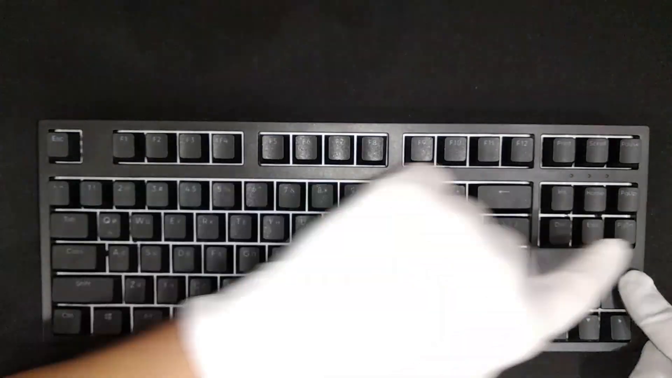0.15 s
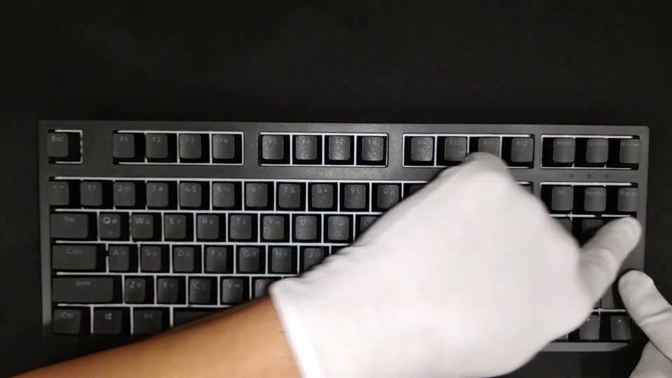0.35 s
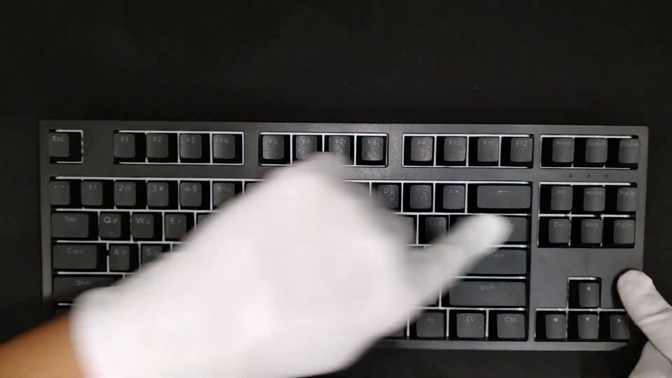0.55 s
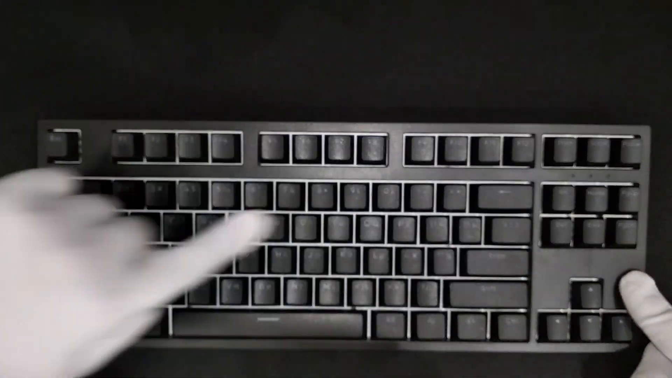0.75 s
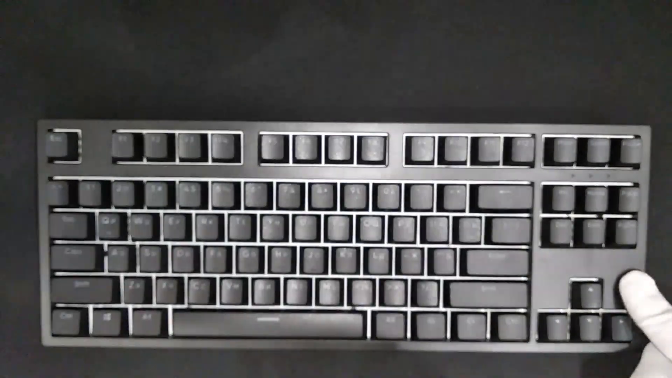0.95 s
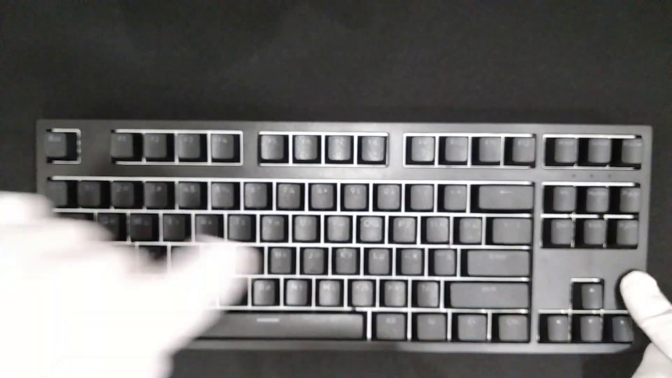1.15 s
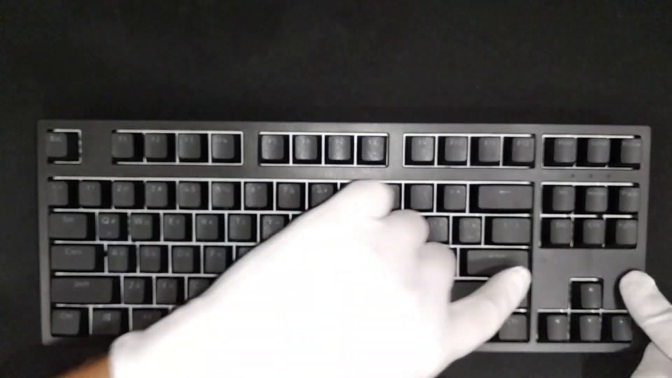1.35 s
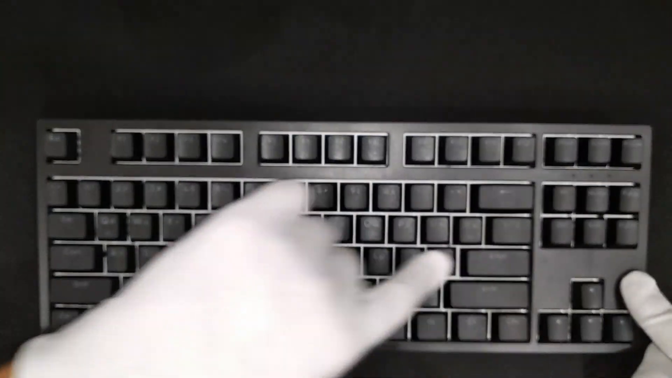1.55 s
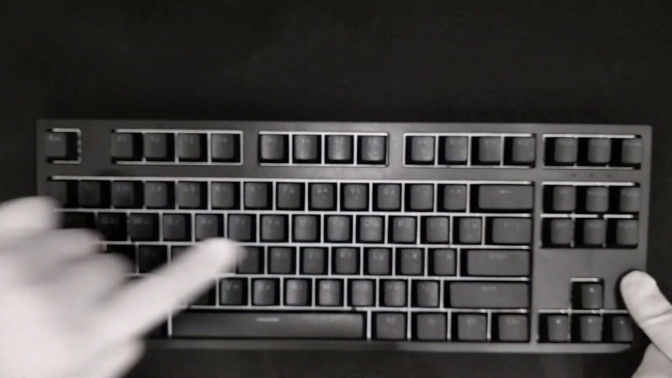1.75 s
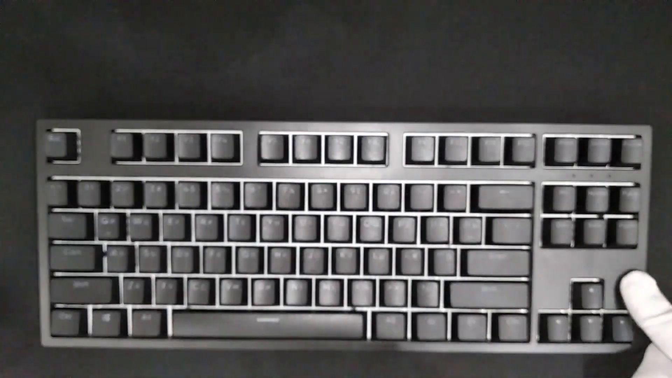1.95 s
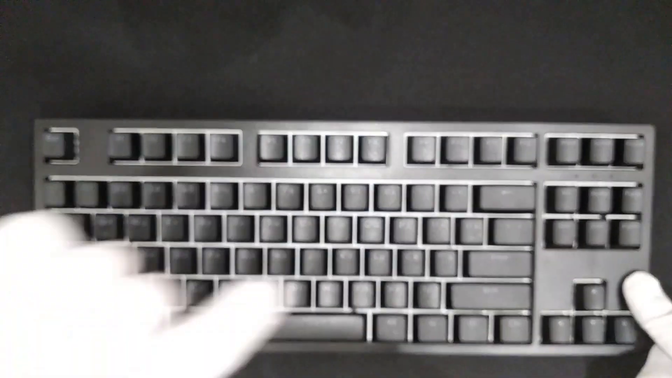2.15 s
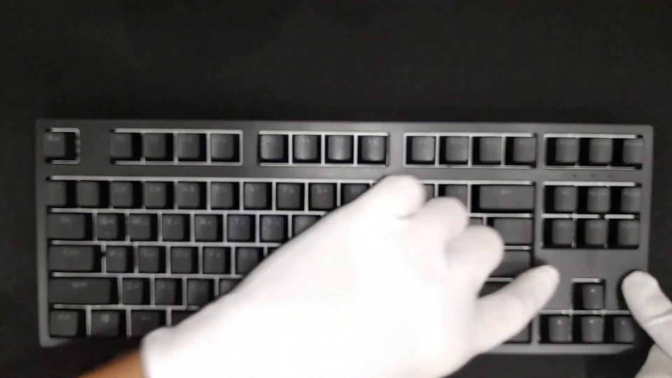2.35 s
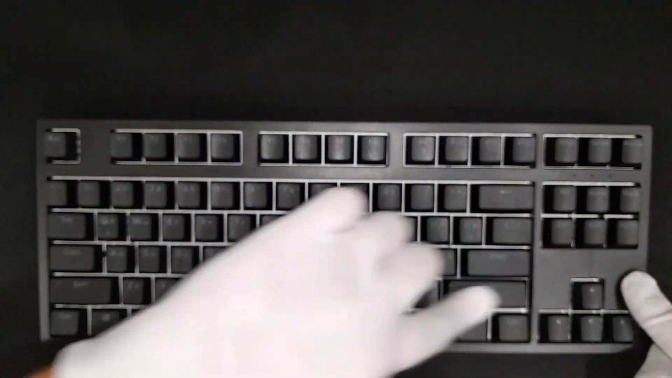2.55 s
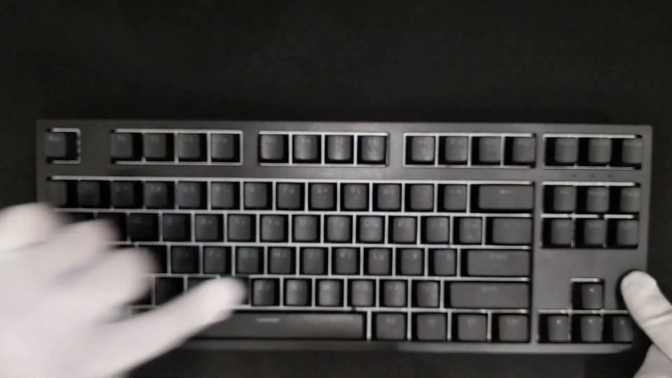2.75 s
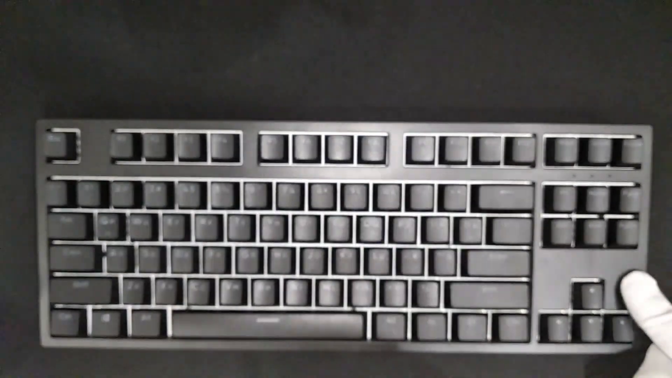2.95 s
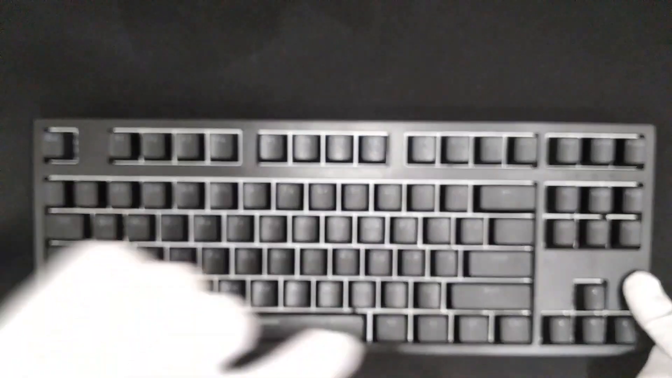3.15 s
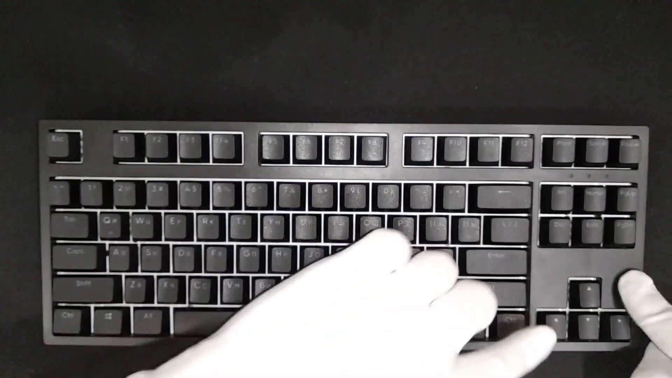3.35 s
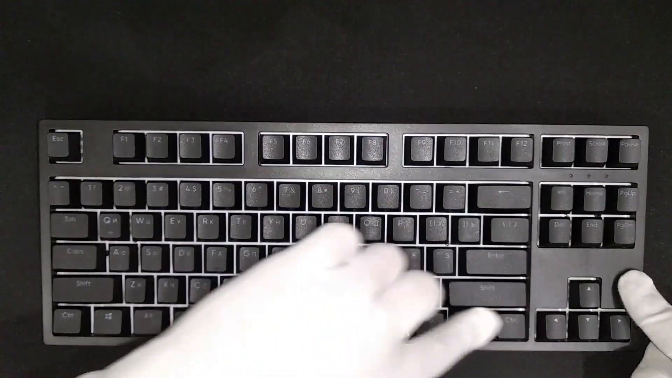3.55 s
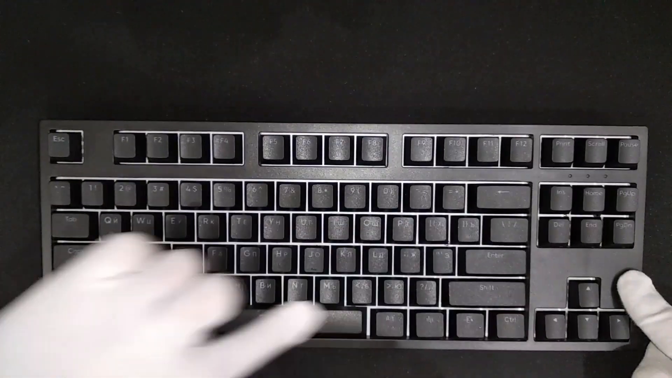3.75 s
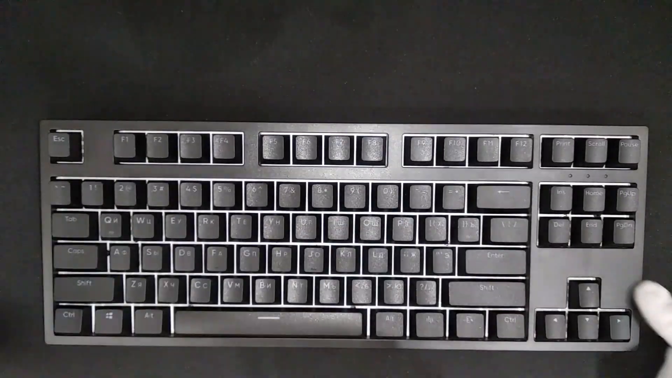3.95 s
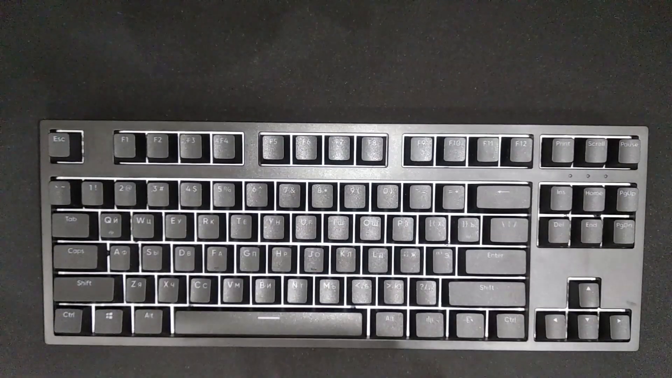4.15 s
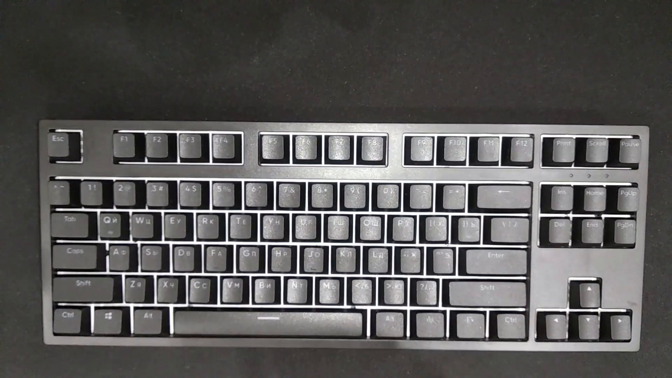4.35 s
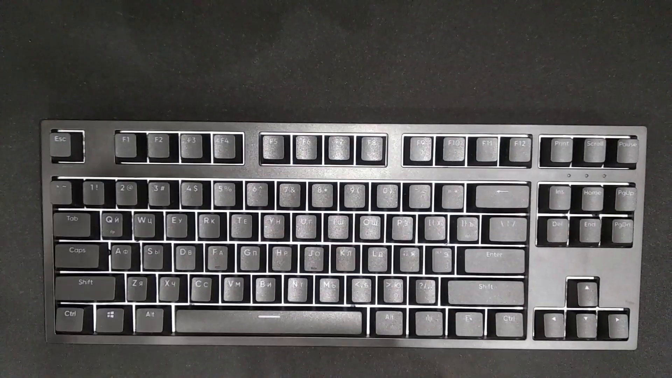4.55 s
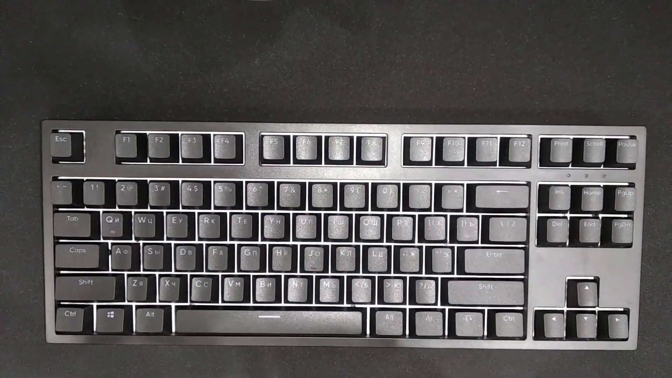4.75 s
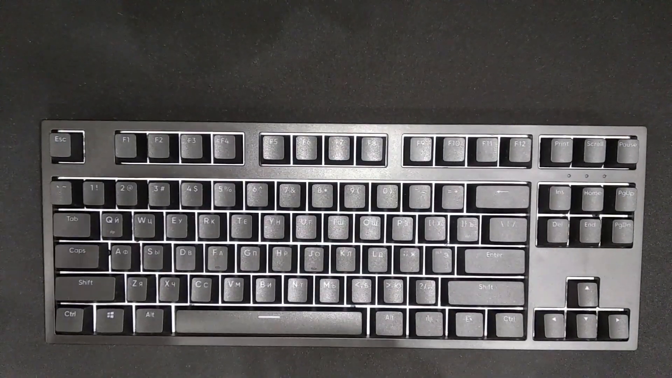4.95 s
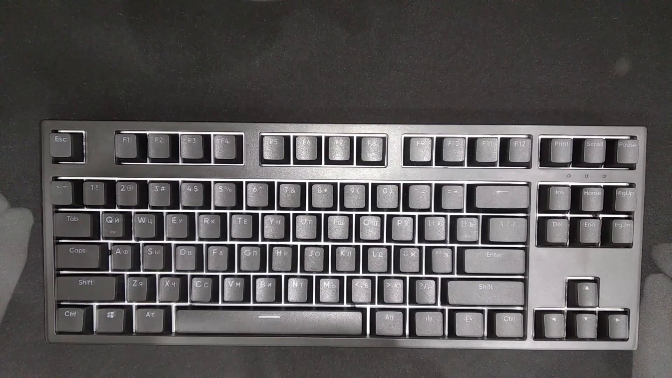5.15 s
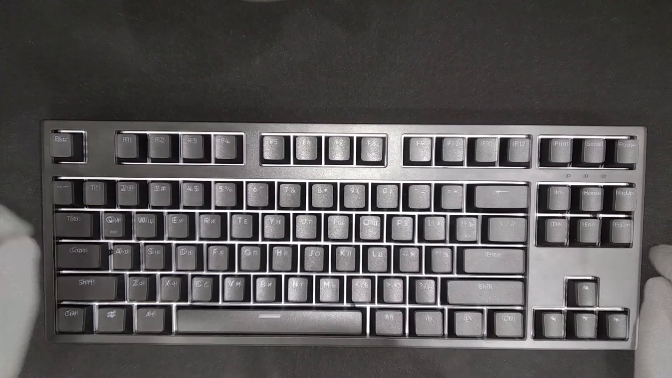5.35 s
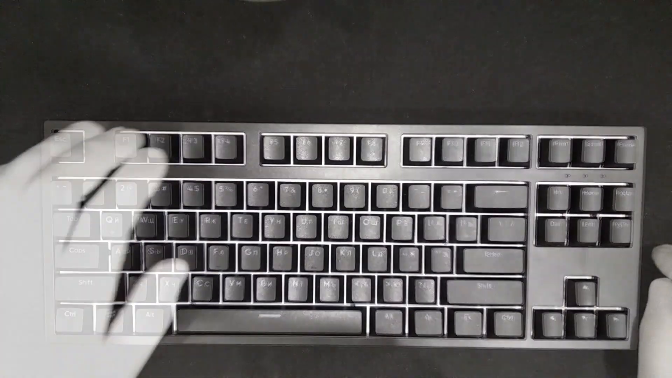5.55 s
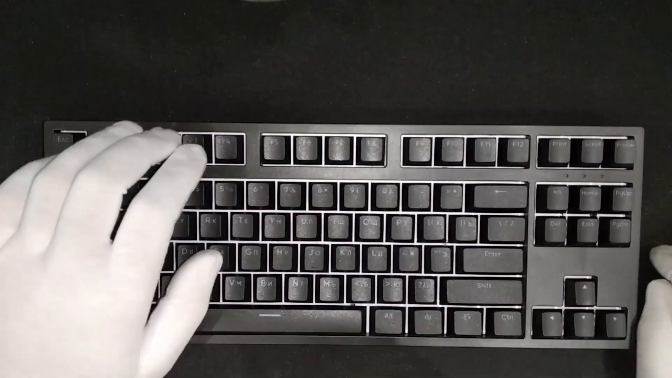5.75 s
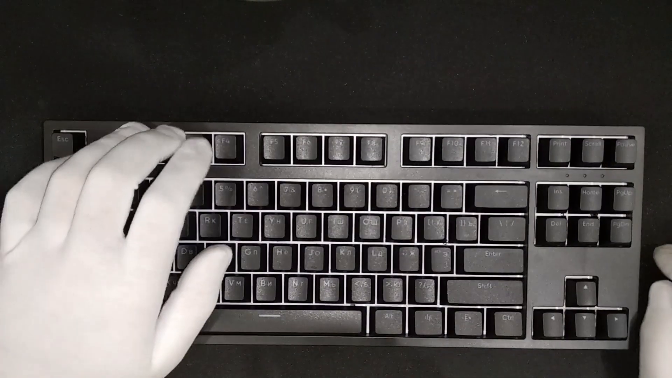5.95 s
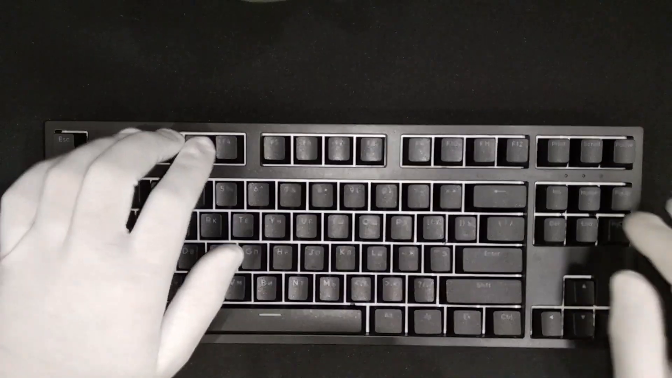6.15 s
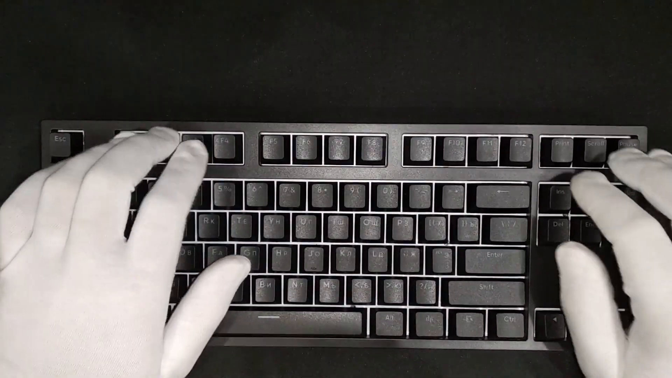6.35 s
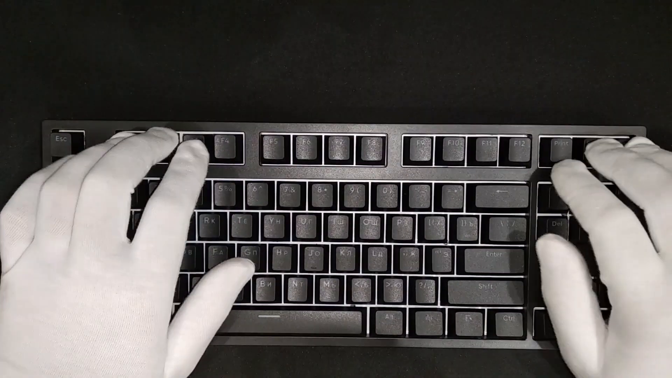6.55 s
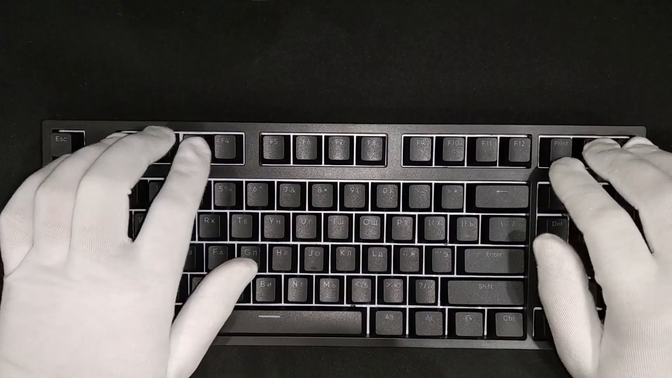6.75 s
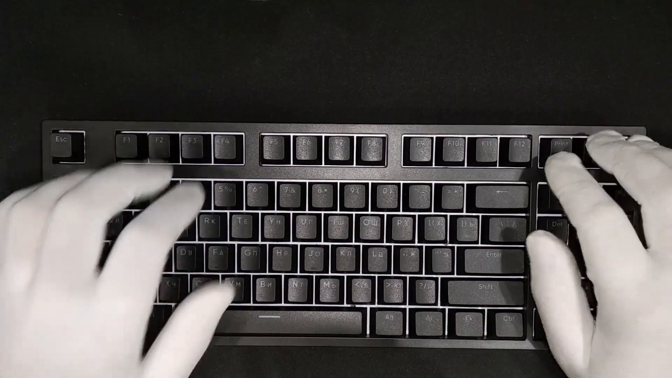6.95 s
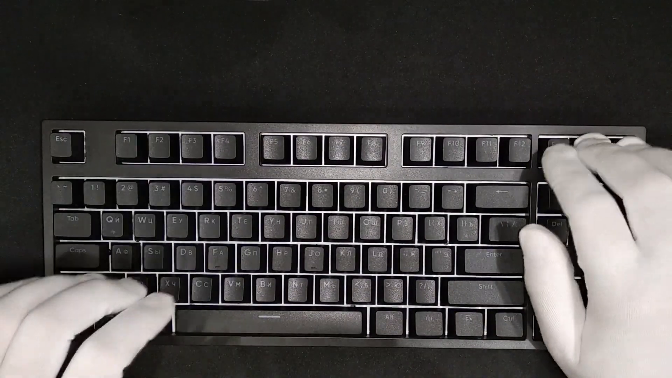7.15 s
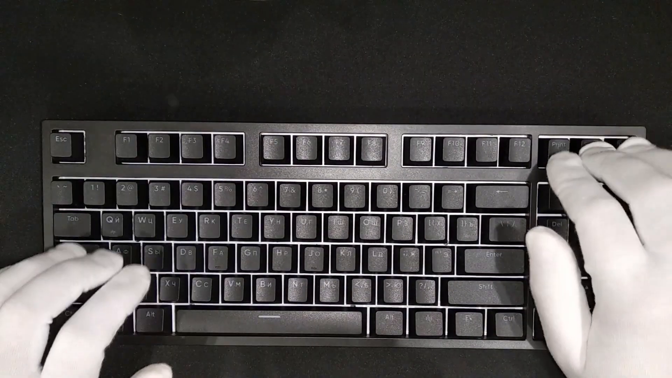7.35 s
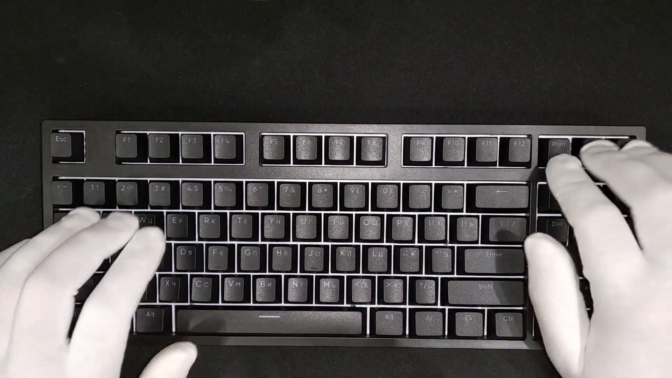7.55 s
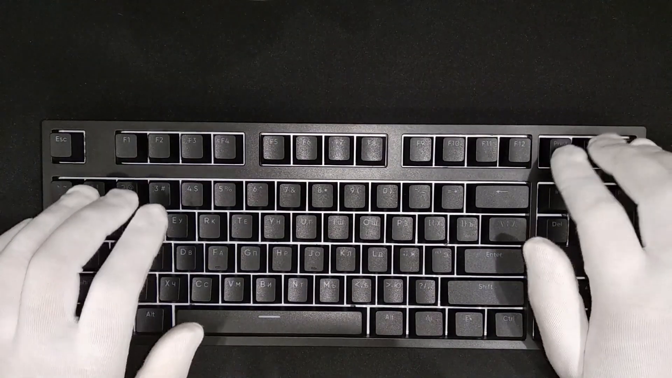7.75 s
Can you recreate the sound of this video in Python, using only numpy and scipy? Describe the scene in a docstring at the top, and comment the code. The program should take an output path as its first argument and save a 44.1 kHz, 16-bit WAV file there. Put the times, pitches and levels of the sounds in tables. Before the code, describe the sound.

Four fast plastic key-sweeps with cloth hiss and growing force, near silence, several bright click-and-release presses, then soft rapid tapping in a small room.

```python
"""Clattering sweeps first: a gloved finger runs four times along the rows of a mechanical keyboard,
close to the microphone. After a pause single keys are pressed and let go, then fingers patter lightly.
Every blow is a noise burst shaped by the resonances of cap and case; cloth is filtered hiss, and the
desk booms as dying sines. A small room answers, over the rumble, hiss and hum of the building."""
import sys
import numpy as np
from scipy import signal
from scipy.fft import rfft, irfft
from scipy.io import wavfile
from scipy.ndimage import uniform_filter1d

SR = 44100
rng = np.random.default_rng(int(sys.argv[2]) if len(sys.argv) > 2 else 0)


def wav_record(signal):
    """Record a signal, one row per channel, as 16-bit PCM in the file named by sys.argv[1]."""
    frames = np.transpose(np.atleast_2d(signal))
    bounded = np.clip(frames, -1, 1)
    # unit amplitude maps onto the largest positive 16-bit level
    quanta = np.round(bounded * 32767).astype(np.int16)
    wavfile.write(sys.argv[1], SR, quanta)


N = 347949  # length in samples
HZ = np.fft.rfftfreq(4096, 1 / SR)  # frequency axis of one blow


def gain_of(db):
    """Decibels to amplitude."""
    return 10 ** (np.asarray(db) / 20)


def evened(x):
    """Scales to rms 1."""
    return x / np.sqrt(np.mean(x ** 2) + 1e-20)


def read(points, hz):
    """Reads a table on a log-frequency axis."""
    f, value = np.transpose(points)
    return np.interp(np.log(hz + 1), np.log(f + 1), value)


def add(mix, s, sound):
    """Mixes a sound in at time s."""
    part = mix[max(round(s * SR), 0):][:len(sound)]
    part += sound[:len(part)]


def stray():
    """A chance amount between -1 and 1: no two keys are alike."""
    return 2 * rng.random() - 1


def bell(f, hz, width):
    """Shape of one resonance, 1 at its centre."""
    return 1 / (1 + (2 * (f - hz) / width) ** 2)


def shaped_noise(count, shape):
    """White noise filtered to a spectral shape, at rms 1."""
    return evened(irfft(rfft(rng.standard_normal(count)) * shape, count))


def causal(db):
    """Spectrum with this gain whose energy comes as early as it can (minimum phase)."""
    log_gain = np.log(gain_of(np.maximum(db, db.max() - 90)))
    mirrored = np.r_[log_gain, log_gain[-2:0:-1]]
    return np.exp(np.conj(signal.hilbert(mirrored)))[:len(db)]


def ring(modes):
    """Dying sines of a struck object."""
    t = np.arange(SR // 2) / SR
    return sum(gain_of(db - 60 * t / t60) * np.sin(2 * np.pi * hz * t) for hz, db, t60 in modes)


# Spectrum of the building's rumble and hiss. Each row: frequency in Hz, relative level in dB.
FLOOR_COLOUR = [(15, -32.5), (25, -11.5), (59, -0.5), (85, -3), (149, -13), (170, -17.5), (317, -24.5),
                (2910, -38.5), (8140, -41), (16000, -43)]
FLOOR_DB = -53.5  # rms


def floor():
    """Low rumble of the building under faint hiss: noise of one steady colour."""
    shape = gain_of(read(FLOOR_COLOUR, np.fft.rfftfreq(N, 1 / SR)))
    return gain_of(FLOOR_DB) * shaped_noise(N, shape)


# A machine running somewhere in the building. Each row: frequency in Hz, rms level in dB.
MACHINE_TONES = [(52.4, -56.5), (69.9, -62.5), (87.3, -61)]


def hum():
    """Steady low sines of a distant machine, each starting at a chance phase."""
    t = np.arange(N) / SR
    return sum(gain_of(db) * evened(np.sin(2 * np.pi * (hz * t + rng.random())))
               for hz, db in MACHINE_TONES)


# Decay of the small room. Each row: frequency in Hz, time to fall 60 dB in seconds.
ROOM_DECAY = [(300, .38), (9000, 0.32), (14000, 0.19)]


def room(x, echo_s, echo_db, early_db, early_t60, tail_db):
    """Scatter from the desk top, one bright echo from a near wall, and a tail that dies band by band."""
    t = np.arange(SR * 3 // 4) / SR
    reflections = rng.standard_normal(len(t)) * (rng.random(len(t)) < .15)  # sparse
    hz, frame_s, z = signal.stft(reflections, SR, nperseg=256)
    decay = gain_of(-60 * frame_s / read(ROOM_DECAY, hz)[:, None])
    tail = signal.istft(z * decay, SR, nperseg=256)[1][:len(t)]
    tail = tail * np.clip(t / 0.0077 - 1, 0, 1)  # silent for 7.7 ms, then fades in over as long
    early = rng.standard_normal(len(t)) * gain_of(-60 * t / early_t60) * (t > .002)
    early = signal.lfilter(*signal.butter(1, 3500, fs=SR), early)
    echo = rng.standard_normal(len(t)) * gain_of(-60 * abs(t - echo_s) / .012) * (t > echo_s)
    parts = ((tail_db, tail), (early_db, early), (echo_db, echo))
    response = sum(gain_of(db) * evened(part) for db, part in parts)
    return signal.fftconvolve(x, response / np.sqrt(len(t)))[:N]  # each part's dB is its energy


# Resonances of the desk. Each row: frequency in Hz, relative level in dB, time to fall 60 dB in seconds.
DESK_MODES = [(84.1, 2, 0.24), (136, -5, 0.27)]
# The hand's weight jolts the board on the desk. Each row: time in seconds, level of the boom in dB.
JOLTS = [(1.921, -30), (2.817, -32), (2.907, -32), (3.877, -26), (3.93, -30)]


def desk(blows, knock_db):
    """The desk booms under each swept key and under the weight of the hand."""
    out, boom = np.zeros(N), ring(DESK_MODES)
    for s, level_db, *_ in blows:
        add(out, s, gain_of(level_db + knock_db) * boom)
    for s, db in JOLTS:
        add(out, s, gain_of(db) * boom)
    return out


def thuds(hz, db, t60):
    """A pressed or tapped key pushes the case briefly against the desk: one dying low sine."""
    out, push = np.zeros(N), ring([(hz, db, t60)])
    for s, level_db, *_ in PRESSES + TAPS:
        add(out, s, gain_of(level_db) * push)
    return out


# A dull knock on the desk. Each row: frequency in Hz, width before squaring in Hz, relative level in dB.
BUMP_MODES = [(393, 130, -8.5), (239, 270, -15.5), (920, 350, -21.5)]


def bump():
    """A soft, scuffing knock as the steadying hand lets go of the board: noise in a few low bands."""
    s, db, t60 = 4.04, -39, .22
    out, t = np.zeros(N), np.arange(SR // 2) / SR
    f = np.fft.rfftfreq(len(t), 1 / SR)
    shape = sum(gain_of(level_db) * bell(f, hz, width) ** 2 for hz, width, level_db in BUMP_MODES)
    scuff = shaped_noise(len(t), shape)
    add(out, s, gain_of(db - 60 * (t / t60) ** 2) * scuff)  # holds a moment, then drops away
    return out


# The gloves stir beside the board. One row: start and end in seconds, rms before fading in dB, centre in Hz.
RUSTLE = (4.5, 6, -73, 8600)
# Cloth slides over plastic. Each row: start and end in seconds, rms before fading in dB, centre in Hz.
RUBS = [(0.382, 0.906, -51, 11000), (1.396, 1.72, -59.5, 9400), (2.453, 2.744, -55.5, 6980),
        (3.596, 3.922, -44, 9610)]


def glove(slides, width_hz, broad_db):
    """Rubbing cloth: each slide is a swelling hiss around one resonance, over a broader hiss."""
    out = np.zeros(N)
    for start, end, db, hz in slides:
        count = max(int((end - start) * SR), 64)
        f = np.fft.rfftfreq(count, 1 / SR)
        broad = gain_of(broad_db) * gain_of(read(SWEPT_COLOUR, f))
        hiss = shaped_noise(count, bell(f, hz, width_hz) + broad)
        add(out, start, gain_of(db) * hiss * signal.windows.tukey(count, .7))
    return out


def grazes(per_s, lift_db):
    """Blows on caps that the sliding glove only nudges, at chance moments and tending hardest in mid-slide."""
    rows = []
    for start, end, db, _ in RUBS:
        for when, force, pitch in rng.random((int(per_s * (end - start)), 3)):
            s = start + when * (end - start)
            swell_db = 20 * np.log10(np.sin(np.pi * when) ** 2 + 1e-6)
            level_db = db + lift_db + swell_db + 10 * force
            rows.append((s, level_db, 1000 * 4 ** pitch, -10))  # 1 to 4 kHz, dull treble
    return rows


def rattle(low_t60, high_t60=.005):
    """The crowded modes of a plastic key: a burst whose treble dies first, levelled so no band dominates."""
    t = np.arange(2 * len(HZ) - 2) / SR
    noise = rng.standard_normal(len(t)) * (1 - np.exp(-t / 0.00026))  # contact takes a moment to firm up
    low, high = (rfft(evened(noise * gain_of(-60 * t / t60))) for t60 in (low_t60, high_t60))
    low_share = 1 / (1 + 1j * HZ / 3000)
    z = low_share * low + (1 - low_share) * high
    return z / np.sqrt(uniform_filter1d(abs(z) ** 2, size=110))  # levelled over about 1.2 kHz


# Resonances of plate and case. Each row: frequency in Hz, width in Hz, lift in dB before the case share.
CASE = [(434.2, 110, 6.5), (1040, 64, 6), (1480, 190, 3.5), (3480, 1200, 7.5)]
# The part of the board the finger is passing. Each row: time in seconds, hollowness of the case in dB,
# switch ping in Hz, lift of the ping in dB.
PLACE = [(0.78, 4, 11540, 12), (0.892, -4, 7300, 4.5), (1.599, 4.5, 11500, 5.5), (1.871, -3.5, 7100, 6),
         (2.73, 4.5, 11700, 8), (2.82, -2.5, 9190, 10), (3.7, 2, 9340, 10.5)]


def clacks(rows, colour, low_t60, touch_db, touch_s, settle_db, settle_s, case=.55, cap_db=7.0,
           sweeping=False):
    """A tick as the finger meets the cap, the stem's stop ringing cap and case, the loose cap settling."""
    out = np.zeros(N)
    body_db = read(colour, HZ) + case * sum(db * bell(HZ, hz, width) for hz, width, db in CASE)
    treble = 1 / (1 + (4500 / (HZ + 1)) ** 4)
    bass = 1 / (1 + (HZ / 900) ** 4)
    place_s, *place = np.transpose(PLACE)
    for s, level_db, cap_hz, treble_db in rows:
        db = body_db + treble_db * treble + cap_db * bell(HZ, cap_hz, 0.32 * cap_hz)
        if sweeping:  # the board sounds different from one end of a row to the other
            hollow_db, ping_hz, ping_db = (np.interp(s, place_s, column) for column in place)
            db = db + hollow_db * bass + ping_db * bell(HZ, ping_hz, 520)
        full, thin = causal(db), causal(db - 10 * bass)  # light contacts hardly move the case
        early, late = np.array([touch_s, settle_s]) * 2 ** rng.uniform(-1, 1, 2)  # half to double
        for lag, contact_db, tone in ((0, 0, full), (-early, touch_db, thin), (late, settle_db, thin)):
            blow = irfft(tone * rattle(low_t60))[:len(HZ)]
            # the level is the rms the blow would have if its energy lay within 5 ms
            size = gain_of(level_db + contact_db) * np.sqrt(.005 * SR / len(blow))
            add(out, s + lag, size * evened(blow))
    return out


TREBLE_SPREAD_DB = 4.5  # largest chance change of treble, either way
# Colour of a fingertip tap. Each row: frequency in Hz, relative level in dB.
TAPPED_COLOUR = [(240, -33), (400, -11), (708, -10.5), (935, -0.5), (1960, -8), (2320, -9.5), (11000, -21),
                 (16000, -42)]
# Light fingertip taps. Each row: time in seconds, level in dB, keycap pitch in Hz.
TAPS = [(7.0744, -33.5, 1280), (7.1188, -36.5, 990), (7.1638, -36.5, 1880), (7.2029, -34, 980),
        (7.236, -35, 1530), (7.2995, -34.5, 1210), (7.3527, -35, 1240), (7.3825, -32.5, 1060),
        (7.411, -34, 1500), (7.464, -35.5, 1820), (7.4924, -29.5, 2060), (7.5411, -35, 1220),
        (7.561, -33.5, 1010), (7.5927, -27.5, 950), (7.6477, -32, 1990), (7.6788, -34.5, 1000),
        (7.7418, -32.5, 1490), (7.7715, -32.5, 910), (7.7944, -27.5, 1360), (7.864, -33, 1880)]


def tapped_keys():
    """Fingertips patter on the caps: soft blows with little treble."""
    blows = [(s, db, hz, -2 + TREBLE_SPREAD_DB * stray()) for s, db, hz in TAPS]
    return clacks(blows, TAPPED_COLOUR, low_t60=0.019, touch_db=-22.5, touch_s=0.002,
                  settle_db=-12.5, settle_s=0.016)


# Colour of a pressed key. Each row: frequency in Hz, relative level in dB.
PRESSED_COLOUR = [(220, -19.5), (380, -17), (1050, -3), (1230, -7), (1510, 0.5), (3510, -7.5), (10800, -14),
                  (16000, -33)]
# Keycap of the first finger going down. One row: pitch in Hz, treble in dB.
DOWN_TONE = (2230, 5.2)
# Keycap of the second finger. One row: pitch in Hz, treble in dB.
SECOND_TONE = (3300, 2.9)
# Two fingers press almost together, then let go. Each row: time down in seconds, level in dB, lag of the
# second finger in seconds, its level in dB, release in seconds, its level in dB, its keycap pitch in Hz.
PRESSES = [(5.9478, -25.5, -.018, -48, 6.0678, -31.5, 1750),
           (6.167, -22.5, .043, -41.5, 6.2725, -29.5, 3900),
           (6.3604, -22.5, 0.017, -32.5, 6.4787, -26, 3980), (6.5994, -33, -.018, -34.5, 6.693, -29, 3930),
           (6.7915, -19.5, 0.012, -27.5, 6.9057, -24, 1490)]


def pressed_keys():
    """Keys bottom out brightly, the second finger's cap rattles, and the keys spring back duller."""
    down = [(s, db, *DOWN_TONE) for s, db, *_ in PRESSES]
    second = [(s + lag, db, *SECOND_TONE) for s, _, lag, db, *_ in PRESSES]
    release = [(s, db, hz, -2.5) for *_, s, db, hz in PRESSES]
    case = 1.1  # share of the case resonances
    bottoming = clacks(down, PRESSED_COLOUR, low_t60=0.012, touch_db=-29, touch_s=.014,
                       settle_db=-26.5, settle_s=.007, case=case, cap_db=7.5)
    rattling = clacks(second, PRESSED_COLOUR, low_t60=0.014, touch_db=-24, touch_s=.004,
                      settle_db=-6.5, settle_s=.021, case=case, cap_db=-2.5)
    springing = clacks(release, PRESSED_COLOUR, low_t60=0.019, touch_db=-18, touch_s=0.0036,
                       settle_db=-15, settle_s=0.015, case=case, cap_db=5.5)
    return bottoming + rattling + springing


BRIGHT_DB, BRIGHT_FROM_DB, DULLING = 3.5, -16.5, 1  # full blow's treble; below this level, dB lost per dB


def brightness(level_db):
    """Treble of a blow in dB: soft blows are duller."""
    return BRIGHT_DB + DULLING * min(level_db - BRIGHT_FROM_DB, 0)


LEAN_DB, DIG_IN_KEYS = 3, 1.2  # the hand leans harder along the row; the finger sinks in over the first keys
UNEVEN_DB, CAP_SPREAD_OCTAVES = 2.0, .8  # largest chance change, either way


def sweep(first_s, last_s, keys, start_speed, end_speed, end_db, soft_db, start_hz, end_hz, extra_db):
    """One blow for each key of a row, as the finger changes speed and gathers weight."""
    key = np.arange(round(keys))
    along = key / key[-1]
    slowness = [1 / start_speed, 1, 1 / end_speed]
    gaps = np.interp(np.linspace(0, 1, len(key) - 1), [0, .5, 1], slowness)
    times = first_s + (last_s - first_s) * np.r_[0, np.cumsum(gaps)] / gaps.sum()
    levels = end_db - LEAN_DB * (1 - along) + soft_db * np.exp(-key / DIG_IN_KEYS)
    pitches = start_hz * (end_hz / start_hz) ** along
    blows = []
    for s, db, hz in zip(times, levels, pitches):
        level_db = db + UNEVEN_DB * stray()
        cap_hz = hz * 2 ** (CAP_SPREAD_OCTAVES * stray())
        treble_db = brightness(db) + extra_db + TREBLE_SPREAD_DB * stray()
        blows.append((s, level_db, cap_hz, treble_db))
    return blows


# The finger runs along a row of keys. Each row: first and last key in seconds, number of keys, speed at the
# start and at the end as a share of the speed midway, level in dB at the end before chance, change of the
# first key for softness in dB, keycap pitch at start and end in Hz before chance, extra treble in dB.
SWEEPS = [(0.5801, 0.891, 13, 0.86, 1.14, -14, 0, 750, 2370, 0),
          (1.5502, 1.871, 12, .70, .985, -12, -15, 1100, 1830, .5),
          (2.62, 2.873, 12, .81, .93, -10, -8.5, 1900, 2000, 1.5)]
# Keys struck out of step, at the ends of the rows and along the uneven bottom row.
# Each row: time in seconds, level in dB, keycap pitch in Hz.
KNOCKS = [(0.3414, -36, 1170), (0.4294, -25, 1035), (0.4819, -27, 3070), (0.5213, -23, 1936),
          (0.9216, -13, 2560), (1.9184, -15.5, 1510), (2.513, -43.5, 1500), (2.6108, -25, 2080),
          (2.9021, -8, 4460), (3.4843, -31, 1075), (3.5564, -25.5, 4010), (3.6304, -25, 1070),
          (3.6784, -18.5, 3080), (3.7187, -12.5, 2270), (3.8501, -23.5, 1280), (3.8604, -12.5, 2112),
          (3.8722, -13.5, 3850), (3.881, -20.5, 3517), (3.887, -8.5, 2386), (3.9035, -16.5, 1303),
          (3.9092, -10, 1352), (3.9287, -7, 4240)]


def swept_blows():
    """Rows for every key the finger strikes, in step along the rows and out of step."""
    blows = [blow for row in SWEEPS for blow in sweep(*row)]
    return blows + [(s, db, hz, brightness(db)) for s, db, hz in KNOCKS]


# Colour of a swept key. Each row: frequency in Hz, relative level in dB.
SWEPT_COLOUR = [(150, -55.5), (260, -21), (345, -9.5), (450, -7.5), (618, -5), (1640, 1), (3300, -6.5),
                (4800, -9), (9170, -10.5), (10500, -16.5), (11700, -16), (16000, -31.5)]


def swept_keys(blows):
    """The finger clatters along the rows and nudges further caps: each blow rings cap, case and switch."""
    return clacks(blows + grazes(per_s=19, lift_db=6.5), SWEPT_COLOUR, low_t60=.013, touch_db=-13.5,
                  touch_s=.0036, settle_db=-23.5, settle_s=.009, sweeping=True)


def scene():
    """Keys, glove and desk close to the microphone, in the room."""
    blows = swept_blows()
    pressed = pressed_keys()
    cloth = glove(RUBS, width_hz=2400, broad_db=-4.5) + glove([RUSTLE], width_hz=3400, broad_db=-27)
    handling = swept_keys(blows) + tapped_keys() + cloth + bump()
    radiated = handling + gain_of(-1) * pressed  # the single presses sound drier than the rest
    wet = room(radiated, echo_s=.0098, echo_db=-17.5, early_db=-20.5, early_t60=0.12, tail_db=-20.0)
    low = desk(blows, knock_db=-27.5) + thuds(hz=144, db=-26.5, t60=0.23)
    return (handling + pressed + wet + low + floor() + hum())[None]


def record(dry):
    """Peaks beyond full scale overload the recorder and are clipped; then a low-pass limits the band."""
    clipped = np.clip(dry, -1, 1)
    low_pass = signal.firwin(255, 16100, window=("kaiser", 8), fs=SR)  # edge in Hz
    return signal.oaconvolve(clipped, low_pass[None], "same")


dry = scene()
out = record(dry)
wav_record(out)
```